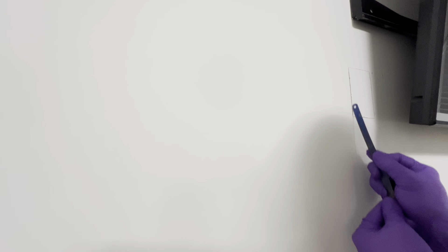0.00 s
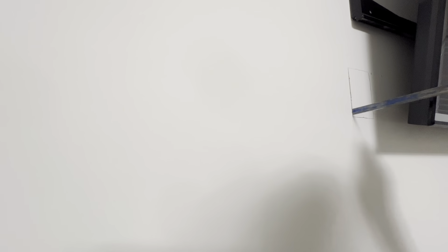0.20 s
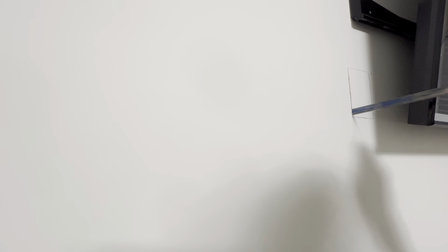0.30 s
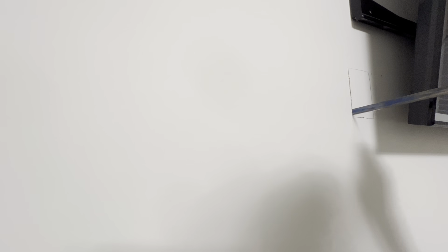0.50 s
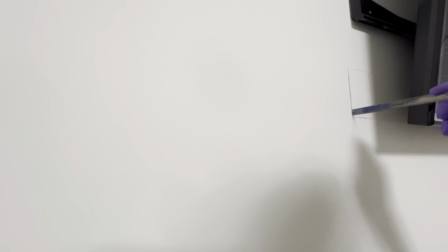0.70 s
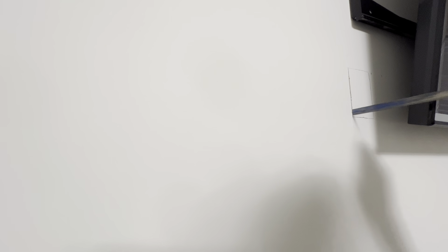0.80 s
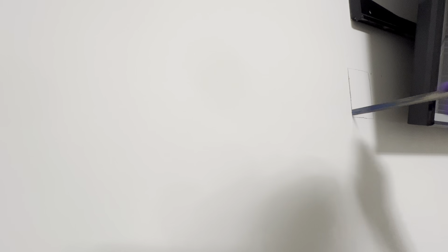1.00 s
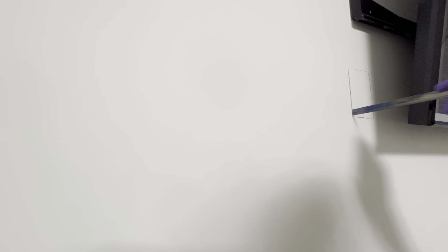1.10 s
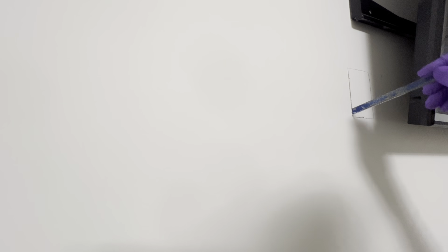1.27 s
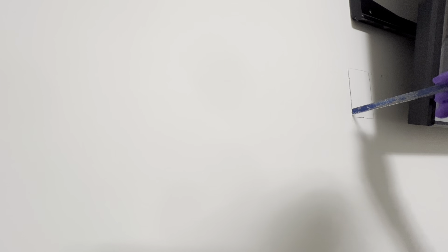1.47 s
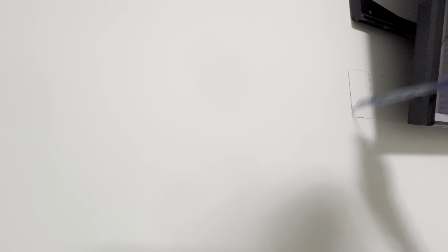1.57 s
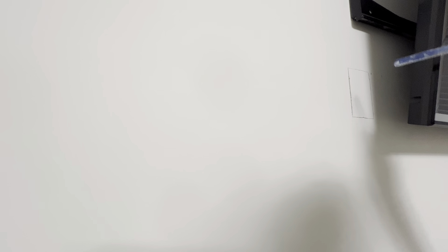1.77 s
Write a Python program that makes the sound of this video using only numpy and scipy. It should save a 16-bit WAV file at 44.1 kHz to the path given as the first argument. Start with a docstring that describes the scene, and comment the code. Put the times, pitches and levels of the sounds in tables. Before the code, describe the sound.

Drywall is sawn by hand in three quick, rasping back-and-forth strokes, the gypsum crumbling and the panel booming. The sawing stops on a knock and click, and the blade scrapes out twice, near the microphone in a small room.

```python
"""A blade tip lightly scores drywall, close to the microphone in a small, faintly hissing room.
It is a hacksaw blade held in the hand. The sawing cuts in abruptly with a sharp click; in three
push-pull strokes the teeth rasp, the gypsum crumbles and the panel booms. It ends on a dull knock and
breaks off with a click; then the blade scrapes twice out of the slot with a thin steel ring."""
import sys
import numpy as np
from scipy import signal
from scipy.fft import rfft, irfft, next_fast_len
from scipy.io import wavfile
from scipy.ndimage import uniform_filter1d, map_coordinates

SR = 44100
rng = np.random.default_rng(int(sys.argv[2]) if len(sys.argv) > 2 else 0)


def store_pcm(level_fs):
    """Save levels as 16-bit WAV."""
    pcm = np.round(np.clip(level_fs, -1, 1) * 32767).astype(np.int16)
    wavfile.write(sys.argv[1], SR, np.atleast_2d(pcm).T)


N = 81585
T = np.arange(N) / SR

# Room tone: frequency_hz, relative_db
AIR_SPECTRUM = [(20, -80), (50, -72), (130, -79), (220, -93), (400, -96), (800, -101), (1200, -99),
                (1500, -95), (2000, -87), (3000, -98), (4400, -108), (6800, -101), (9000, -110),
                (11000, -125), (16000, -135)]
# Decay of the small room: frequency_hz, t60_s
ROOM_DECAY = [(80, 0.26), (250, 0.15), (700, 0.22), (3000, 0.16), (10000, 0.15)]
# Modes of the panel: pitch_hz, width_hz, gain_db, left_minus_right_db
PANEL_MODES = [(84.2, 4.2, 11, 3), (135.85, 6.9, 14.5, 2.5), (185.3, 6.5, 5.5, 11.5), (226.1, 4.5, 2.5, -1),
               (335.6, 18.5, -1, -11.5), (450.4, 59, 2.5, 1.5), (566, 12.7, 6.5, 1.5), (632.4, 20, 7, 5.5),
               (693.3, 15.6, 5, 4.5), (749.7, 24.5, 5, -3.5), (904.4, 87, 8, 2.5), (1087, 33, 6, 0),
               (1149, 13.6, 4, 0), (2997, 26, -2, -1.5)]
# The panel's balance at the microphone: frequency_hz, left_minus_right_db
PANEL_PAN = [(80, 3.5), (170, 2.5), (300, -1), (550, 3.5), (1000, -1.5), (1600, 7), (2400, 3), (3900, -5),
             (6300, 3), (8600, -9), (12000, 1)]
# The panel's phase at the microphone: frequency_hz, left_lag_rad
PANEL_LAG = [(80, .05), (300, 0.25), (550, 1.76), (2500, 2.1), (6000, 10.2)]
# Modes of the steel blade: pitch_hz, width_hz, relative_db
BLADE_MODES = [(6420, 200, -1.5), (8330, 150, 4), (8630, 160, -3), (15050, 250, -28)]
# Light scrapes of the tip: start_s, rise_s, hold_s, fall_s, rub_db, grit_db, boom_db, ring_db
TIP_SCRAPES = [(-.02, 0.017, 0.035, 0.25, -55, -52, -54, -73), (0.088, 0.04, 0.06, .2, -47, -50, -50, -74),
               (1.325, 0.005, 0.04, 0.12, -38, -43, -35, -60),
               (1.526, .014, .016, 0.06, -38, -45, -40, -58), (1.56, 0.021, .04, 0.13, -60, -67, -44, -80)]
# Sharp clicks: start_s, level_db
SHARP_CLICKS = [(0.2036, -37.5), (1.2065, -41)]
# Knocks of the blade in the slot: start_s, pitch_hz, level_db
SLOT_KNOCKS = [(.258, 130.5, -24.5), (.296, 121.5, -17.5), (0.677, 284.6, -22.5), (.941, 300, -21.5),
               (1.021, 150, -22.5), (1.091, 321.2, -21), (1.168, 248, -22), (1.541, 348, -32),
               (1.556, 137.4, -29)]
# Teeth snag and thump the board: start_s, strength_db
TOOTH_SNAGS = [(.2032, -0.5), (0.2093, -5.5), (.281, -6), (.303, 3.5), (.626, 2.5), (.643, -0.5),
               (.674, 0.5), (.967, 0.5), (1.159, -6.5)]
# Pushes, pulls and a slow follow-through, with levels going into the panel:
# start_s, fastest_s, end_s, tooth_rate_hz, teeth_db, tear_db, grit_db, boom_db, slide_db
SAW_STROKES = [(.277, 0.315, .380, 470, -24, -33, -33.5, -27.5, -44),
               (.420, 0.49, 0.53, 915, -35, -31.5, -42.5, -36.5, -43),
               (0.613, .656, 0.7, 740, -22.5, -27, -27, -33.5, -41),
               (.690, .722, .785, 420.8, -45.5, -36, -45.5, -37.5, -60),
               (.752, 0.807, .885, 580, -27, -34, -36.5, -41, -44.5),
               (.936, 0.979, 1.043, 729.3, -20.5, -27, -29.5, -34, -43),
               (1.071, 1.12, 1.177, 940, -34.5, -31, -43.5, -34.5, -42.5)]
# Tone colour of each sound: frequency_hz, relative_db
RUB_SPECTRUM = [(60, -13.5), (250, -5.5), (600, 3.5), (900, -8.5), (1300, -13.5), (1700, -11),
                (3000, -28.5), (8000, -53)]  # tip on the cut edge
CLICK_SPECTRUM = [(500, 1.5), (2000, -1), (9000, -18.5), (16000, -28)]
SNAG_SPECTRUM = [(40, -10.5), (120, -3.5), (450, 3.5), (800, -8.5), (1400, -14), (3000, -33.5), (9000, -39),
                 (16000, -68)]
SLIDE_SPECTRUM = [(400, -5), (2400, 1.5), (4200, -2), (6300, 2), (8500, -2.5), (10000, -10.5), (11500, -24),
                  (12800, -38), (15200, -22)]  # hiss of the sliding blade
BOOM_SPECTRUM = [(20, -36), (45, -7.5), (80, -1.5), (130, -5), (180, 1.5), (300, -0.5), (450, -9),
                 (800, -26.5), (3000, -71)]  # body of the board
GRIT_SPECTRUM = [(300, -20.5), (1500, -3), (2100, -2), (2800, 4.5), (3400, -10), (3900, -5.5),
                 (4500, -12.5), (6000, -6), (7600, -16.5), (9800, -20.5), (11200, -40), (12800, -39),
                 (15200, -42.5)]  # crumbling gypsum
RASP_SPECTRUM = [(60, -21), (200, -13), (400, 1), (700, -2), (900, -6.5), (1300, -7.5), (1700, -8),
                 (2100, -17), (2900, -13), (4000, -31), (9000, -53), (16000, -72)]  # teeth biting and tearing

TOP_HZ = 15800
ROOM_DB, AIR_PAN_DB, BLADE_PAN_DB = -1.5, 12, -15  # positive pan is left
BLADE_SKIRT_HZ = 700  # the steel answers only near its modes
CLICK_T60_S, KNOCK_RISE_S, KNOCK_T60_S = 0.015, 0.0026, 0.13
SAW_START_S, SAW_STOP_S, SLIDE_RISE_S = 0.2025, 1.208, 0.013
DRAG_DB, SWAY_DB = -47, -45.5  # the blade drags and the panel sways even between strokes
RASP_GROWS, GRIT_GROWS, BOOM_GROWS = 1.2, 2.36, 0.41  # level as a power of stroke force
TOOTH_JITTER, TOOTH_SCATTER_DB, TOOTH_PUSH_DB = 0.043, 1, -7.5
JUDDER, JUDDER_DB = 0.0542, 3  # the hand's speed and pressure waver as the teeth catch


def amp(db):
    """Decibels to gain."""
    return 10 ** (np.asarray(db) / 20)


def unit(x):
    """Scale to rms 1."""
    return x / np.sqrt(np.mean(x ** 2) + 1e-20)


def along(points, hz):
    """Interpolate (frequency_hz, value) points on a log axis."""
    f, v = np.transpose(points)
    return np.interp(np.log(hz + 1), np.log(f + 1), v)


def sides(db):
    """Left and right gains for a level difference."""
    return amp(np.array([[.5], [-.5]]) * db)


def filtered(x, response):
    """Pass x through a complex frequency response."""
    m = next_fast_len(N + SR)
    return irfft(rfft(x, m) * response(np.fft.rfftfreq(m, 1 / SR)), m)[..., :N]


def coloured(x, spectrum):
    """Pass x through a causal filter of unit power with the given spectrum."""
    m = 2 * next_fast_len(N)
    gain = unit(amp(along(spectrum, np.fft.rfftfreq(m, 1 / SR))))
    cepstrum = irfft(np.log(gain + 1e-6))
    cepstrum[1:m // 2] *= 2  # fold to minimum phase
    cepstrum[m // 2 + 1:] = 0
    return irfft(rfft(x, m) * np.exp(rfft(cepstrum)))[:N]


def resonance(f, hz, width):
    """One causal mode with a peak gain of 1."""
    return 1j * f * width / (hz * hz - f * f + 1j * f * width)


def wobble(rate_hz):
    """A smooth random curve, rate_hz knots a second."""
    return map_coordinates(rng.standard_normal(N // 8), [T * rate_hz], mode="wrap")


def crumbs(rate_hz, scatter_db):
    """Random tiny fractures of uneven size, rms 1."""
    size = amp(scatter_db * np.clip(rng.standard_normal(N), -2, 2)) * rng.choice([-1, 1], N)
    return unit((rng.random(N) < rate_hz / SR) * size)


def sawing_span():
    """1 while the sawing lasts, with abrupt edges."""
    return np.interp(T, [SAW_START_S - .001, SAW_START_S, SAW_STOP_S - .002, SAW_STOP_S], [0, 1, 1, 0])


def room_tone():
    """Quiet steady hiss, stronger on the left of the microphone."""
    noise = rng.standard_normal((2, N))
    return sides(AIR_PAN_DB) * filtered(noise, lambda f: amp(along(AIR_SPECTRUM, f) - 3.5) * np.sqrt(SR / 2))


def room_tail(x, hop=SR // 8):
    """A short diffuse tail, different on each side and changing as the arm moves."""
    out = np.zeros((2, N + SR))
    x = np.pad(np.atleast_2d(x), ((0, 0), (hop, 2 * hop)))
    for at in range(0, N + hop, hop):
        hz, t, noise = signal.stft(rng.standard_normal((2, SR // 3)), SR, nperseg=256)
        t60 = along(ROOM_DECAY, hz)[:, None]
        tail = signal.istft(noise * amp(-60 * t / t60) / np.sqrt(t60), SR, nperseg=256)[1]
        part = x[:, at:at + 2 * hop] * signal.windows.cosine(2 * hop)
        wet = signal.fftconvolve(part, tail / np.linalg.norm(tail[0]), axes=1)
        out[:, at:at + wet.shape[1]] += wet
    return amp(ROOM_DB) * out[:, hop:hop + N]


def panel(x):
    """The board radiates to the close microphone directly and through its modes; the room answers."""
    def response(f):
        modes = sum(amp(db) * sides(pan) * resonance(f, hz, width) for hz, width, db, pan in PANEL_MODES)
        lag = np.exp(np.array([[-.5j], [.5j]]) * along(PANEL_LAG, f))
        return (1 + modes) * lag
    near = filtered(x, response)
    return filtered(amp(-3.5) * (near + room_tail(near)), lambda f: sides(along(PANEL_PAN, f)))


def blade_response(f):
    """The thin steel rings in a few high modes."""
    return 8 * sum(amp(db) * resonance(f, hz, width) / (1 + ((f - hz) / BLADE_SKIRT_HZ) ** 4)
                   for hz, width, db in BLADE_MODES)


def scraping():
    """The tip rubs along the cut edge, stirring the panel and, to the right, the blade's own ring."""
    level = np.zeros((4, N))
    grows = np.array([[1.1], [1.2], [.5], [1.5]])  # the boom lingers, the ring dies first
    for start, rise, hold, fall, rub_db, grit_db, boom_db, ring_db in TIP_SCRAPES:
        attack = np.clip((T - start) / rise, 0, 1)
        release = amp(-60 * np.maximum(T - start - rise - hold, 0) / fall)
        level += amp([[rub_db], [grit_db], [boom_db], [ring_db]]) * (attack * release) ** grows
    rub, grit, boom, ring = level
    board = (coloured(rub * crumbs(1800, scatter_db=4.5), RUB_SPECTRUM)
             + coloured(grit * crumbs(5400, scatter_db=1.5), GRIT_SPECTRUM)
             + coloured(boom * crumbs(900, scatter_db=2), BOOM_SPECTRUM))
    steel = filtered(ring * crumbs(3000, scatter_db=2), blade_response)
    return panel(board) + sides(BLADE_PAN_DB) * (steel + amp(-13) * room_tail(steel))


def clicks():
    """Dry, sharp clicks as the sawing cuts in and breaks off."""
    level = sum((T >= s) * amp(db - 60 * np.maximum(T - s, 0) / CLICK_T60_S) for s, db in SHARP_CLICKS)
    return np.array([coloured(level * noise, CLICK_SPECTRUM) for noise in rng.standard_normal((2, N))])


def knocks():
    """The blade jams or bumps the slot's end: each time a dull, quickly damped knock."""
    out = np.zeros(N)
    for start, hz, db in SLOT_KNOCKS:
        t = np.maximum(T - start, 0)
        gate = 1 if start > SAW_STOP_S else sawing_span()
        envelope = amp(db - 60 * t / KNOCK_T60_S) * (1 - np.exp(-t / KNOCK_RISE_S))
        out += gate * envelope * np.sin(2 * np.pi * hz * t)
    return out


def snags():
    """A snagging tooth gives the board a single thump."""
    impulses = np.zeros(N)
    for start, db in TOOTH_SNAGS:
        impulses[round(start * SR)] += amp(db)
    return coloured(impulses, SNAG_SPECTRUM)


def teeth(rate_hz):
    """Each passing tooth gives a smooth push and a slightly irregular bite; unit power."""
    passed = np.cumsum(rate_hz) / SR
    offset, size = rng.standard_normal((N // 20, 2))[:int(passed[-1])].T
    at = np.interp(np.arange(len(size)) + TOOTH_JITTER * offset, passed, np.arange(N)).astype(int)
    pulses = np.bincount(at, amp(TOOTH_SCATTER_DB * size), N) / np.sqrt(rate_hz)
    bites = unit(coloured(pulses - uniform_filter1d(pulses, size=400), RASP_SPECTRUM))
    push = unit(coloured(np.cos(2 * np.pi * passed), RASP_SPECTRUM))
    return unit(bites + amp(TOOTH_PUSH_DB) * push)


def sawing():
    """Blade speed sets the tooth rate and the force of rasp, grit and boom."""
    rate_hz, slide, level = np.zeros(N), np.zeros(N), np.zeros((4, N))
    grows = np.array([[RASP_GROWS], [RASP_GROWS], [GRIT_GROWS], [BOOM_GROWS]])
    for start, fastest, end, tooth_hz, teeth_db, tear_db, grit_db, boom_db, slide_db in SAW_STROKES:
        ramp = np.interp(T, [start, fastest, end], [0, 1, 0])
        speed = np.sin(ramp * np.pi / 2)
        force = .5 * (speed + ramp)
        rate_hz = np.maximum(rate_hz, tooth_hz * np.sqrt(speed))  # the pitch levels off early
        level += amp([[teeth_db], [tear_db], [grit_db], [boom_db]]) * force ** grows
        contact = np.interp(T, [start, start + SLIDE_RISE_S, fastest, end], [0.026, 0.94, 0.83, 0.071])
        slide += amp(slide_db) * contact ** 1.21  # the hiss catches at once and fades
    bite, tear, grit, boom = level
    tearing = (tear + amp(DRAG_DB)) * amp(2.3 * wobble(109.96)) * crumbs(4000, scatter_db=3)
    juddering_hz = np.maximum(rate_hz, 150) * np.exp(JUDDER * wobble(130))
    rasp = unit(teeth(juddering_hz) * amp(JUDDER_DB * wobble(170)))
    dust = grit * unit(2 + rasp) * crumbs(10000, scatter_db=4.5)  # gypsum crumbles with each bite
    thud = (boom + amp(SWAY_DB)) * crumbs(1500, scatter_db=2.5)
    hiss = (slide + amp(-66.5)) * crumbs(10000, scatter_db=3)
    board = (bite * rasp + coloured(tearing, RASP_SPECTRUM) + coloured(dust, GRIT_SPECTRUM)
             + coloured(thud, BOOM_SPECTRUM) + coloured(hiss, SLIDE_SPECTRUM) + snags())
    return sawing_span() * panel(board)


def scene():
    """Close saw strokes, knocks, clicks and scrapes over the room tone."""
    return sawing() + knocks() + clicks() + scraping() + room_tone()


def record(dry):
    """The microphone signal, cut off above TOP_HZ."""
    return filtered(dry, lambda hz: hz < TOP_HZ)


dry = scene()
out = record(dry)
store_pcm(out)
```